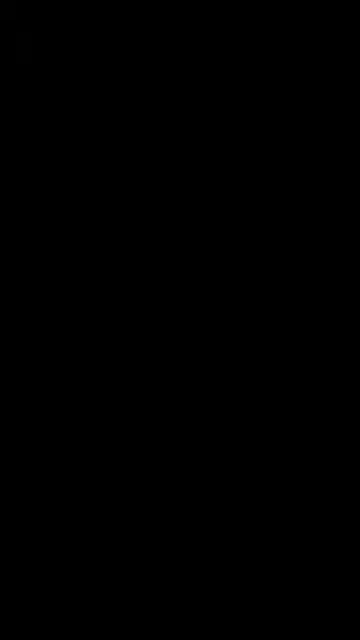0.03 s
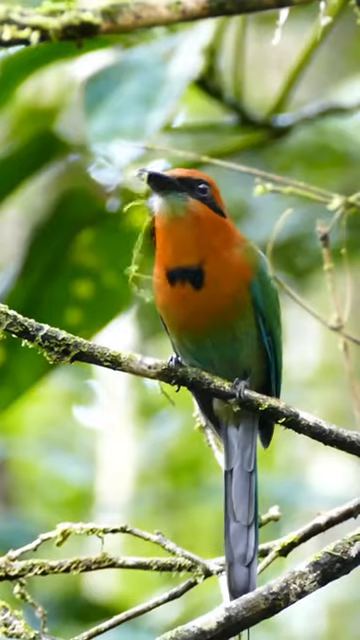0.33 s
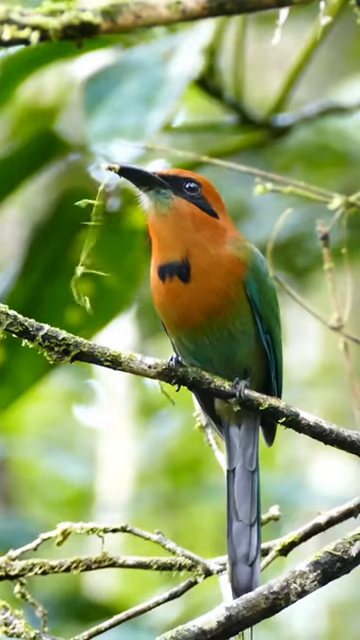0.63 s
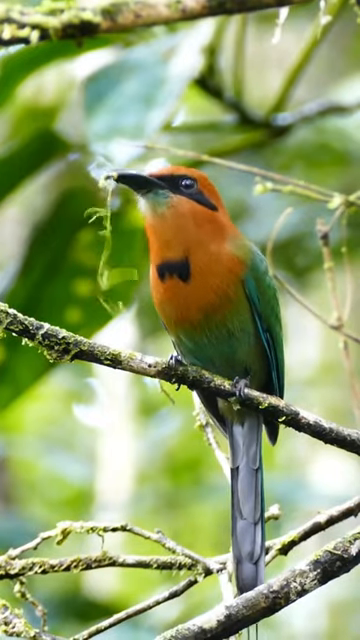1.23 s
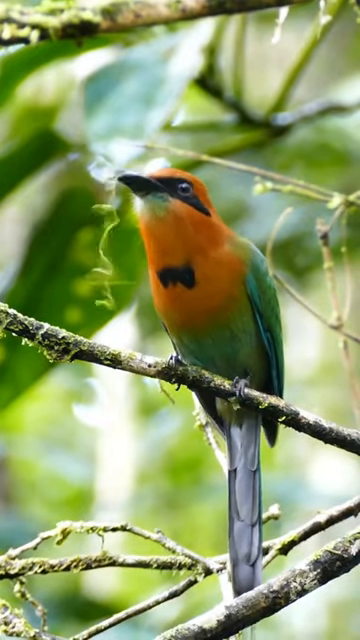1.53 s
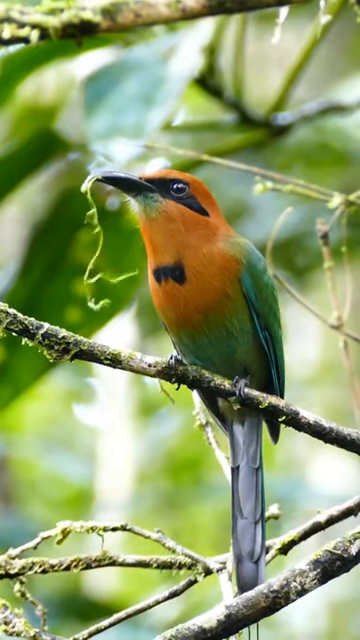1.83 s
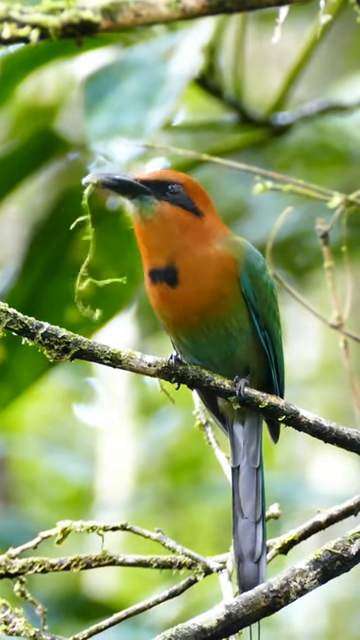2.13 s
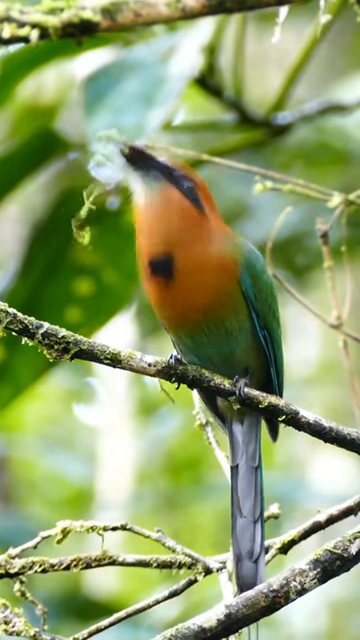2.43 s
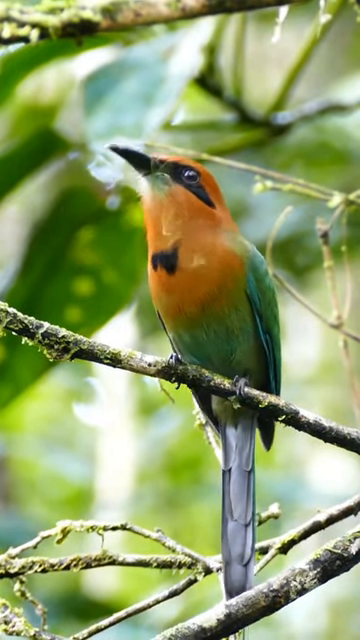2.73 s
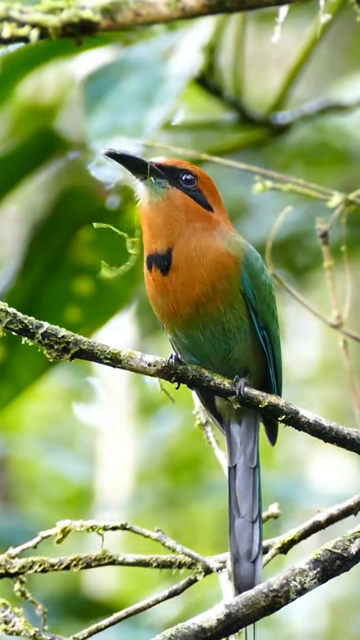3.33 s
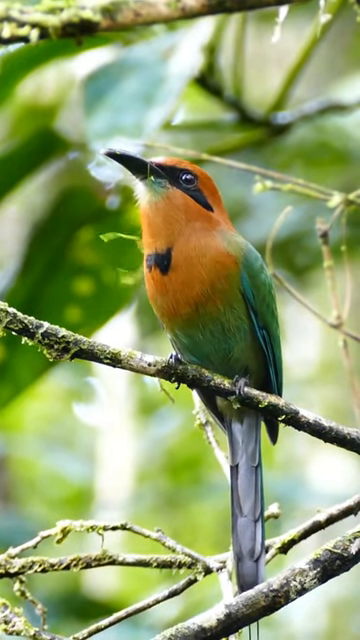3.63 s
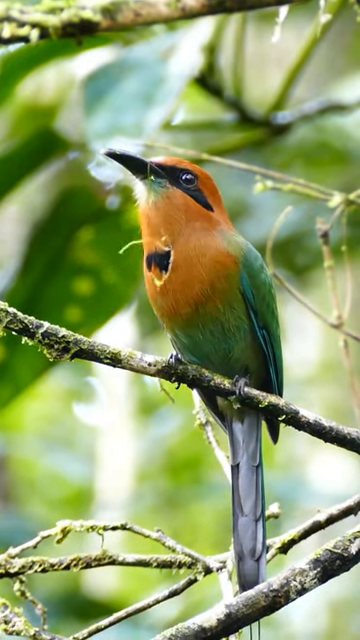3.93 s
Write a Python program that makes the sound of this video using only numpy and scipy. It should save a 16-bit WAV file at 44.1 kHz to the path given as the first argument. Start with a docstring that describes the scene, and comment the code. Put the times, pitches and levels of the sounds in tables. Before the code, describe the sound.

A constant high hiss of insects fills a forest. A few short raspy chirps come from a bird near the microphone, early and again at the end, with distant whistles, light drips on leaves and two thin high calls between.

```python
"""A rainforest. From the start, insects hiss high in the leaves over a soft, distant rush, and the
treble has a watery flicker. A small bird close by scolds with one raspy chirp, a drop taps a leaf, and
far birds begin to whistle. The near bird chirps twice more, then further drops set leaves ringing.
Past halfway another bird gives two thin high calls, while a lower one hoots far off to the right.
Three last scolding chirps close the scene."""
import sys
import numpy as np
from scipy import signal
from scipy.fft import rfft, irfft
from scipy.io import wavfile

SR = 44100
rng = np.random.default_rng(int(sys.argv[2]) if len(sys.argv) > 2 else 0)


def wav_out(sig):
    """Save sig, one row per channel (or a flat mono array), as 16-bit PCM at SR to the path in sys.argv[1]."""
    wavfile.write(sys.argv[1], SR, np.round(np.clip(np.atleast_2d(sig).T, -1, 1) * 32767).astype(np.int16))


N = 176400
T = np.arange(N) / SR
FREQS = np.maximum(np.arange(N // 2 + 1) * SR / N, 1)
FOREST_T60_S, LEAF_T60_S = 1, 0.049


# The scolding chirps. Each row: start in seconds, time of the upward flick in seconds,
# then the levels of the opening, the flick and the rasp in dB, before the throat colours them.
CHIRPS = [(0.195, 0.26, -57.5, -47.5, -80), (1.119, 1.184, -51, -43, -59),
          (1.247, 1.307, -46.5, -42.5, -54), (3.5523, 3.623, -50.5, -42.5, -58),
          (3.685, 3.7452, -45.5, -42, -51), (3.827, 3.889, -44, -42.5, -59)]

def scolding_bird():
    """Each chirp swoops down to a rasping low note, swells, then flicks cleanly up and falls away."""
    low_hz, swoop_hz, swoop_s = 2125, 6300, 0.0028
    flick_hz, flick_s, sag_hz_per_s = 3063, 0.0036, 32700
    attack_s, opening_s, swell_s, hold_s, release_s = 0.002, 0.014, 0.017, 0.0087, 0.0026
    pulses_per_s, rasp_hz, second_voice_offset_hz = 190, 158, 1320
    throat_hz, throat_width_hz, throat_db = 3650, 750, 3.5
    out = np.zeros(N)
    for start, flick_at, opening_db, flick_db, rasp_db in CHIRPS:
        t, since_flick = np.maximum(T - start, 0), T - flick_at
        hz = low_hz + swoop_hz * np.exp(-t / swoop_s)
        hz += flick_hz / (1 + (since_flick / flick_s) ** 2)
        hz -= sag_hz_per_s * np.clip(since_flick, 0, 2 * hold_s)
        opening = from_db(opening_db) * np.exp(-(t / opening_s) ** 2)
        swell = from_db(flick_db) * np.exp(np.minimum(since_flick + flick_s, 0) / swell_s)
        # The rasp lives only between the swoop and the flick.
        rasp = np.clip(t / opening_s - .5, 0, 1) * np.clip(-since_flick / (2 * flick_s) - .5, 0, 1)
        level = np.sqrt(opening ** 2 + swell ** 2 + (rasp * from_db(rasp_db)) ** 2)
        level *= np.minimum(t / attack_s, 1) * np.exp(-np.maximum(since_flick - hold_s, 0) / release_s)
        level *= from_db(-0.008 * np.clip(hz - 4300, 0, 4300))  # the highest pitches are softer
        # Each sweep snaps as it crosses the throat resonance.
        level *= from_db(throat_db * np.exp(-((hz - throat_hz) / throat_width_hz) ** 2))
        phase = phase_of(hz + rasp * rasp_hz * drift(500))
        second_phase = phase + phase_of(np.full(N, second_voice_offset_hz))
        second_voice = 0.71 * rasp * drift(400) * np.sin(second_phase)
        pulses = np.sin(phase_of(pulses_per_s * (1 + 0.3 * drift(pulses_per_s))))
        first_voice = (1 - 0.26 * rasp + 0.79 * rasp * pulses) * np.sin(phase)
        octave = from_db(-15) * np.sin(2 * phase)
        out += np.sqrt(2) * level * (first_voice + second_voice + octave)
    return out


# The thin high calls. Each row: start in seconds, length in seconds, first and last centre pitch
# in Hz, wobble depth in Hz, level in dB.
THIN_CALLS = [(2.546, 0.061, 7430, 7600, 520, -40.5), (3.044, 0.048, 6900, 7700, 1110, -46)]

def thin_calls():
    """A bird's pure high notes open with a dying wobble, settle and climb."""
    wobbles_per_call, wobble_decay_s = 2.54, 0.013
    out = np.zeros(N)
    for start, length, first_hz, last_hz, wobble_hz, db in THIN_CALLS:
        progress = np.clip((T - start) / length, 0, 1)
        climb = first_hz + (last_hz - first_hz) * progress ** 1.12
        depth = wobble_hz * np.exp(-progress * length / wobble_decay_s)
        wobble = depth * np.cos(2 * np.pi * wobbles_per_call * progress)
        envelope = np.sqrt(2 * np.abs(np.sin(np.pi * progress ** 0.87)))
        out += from_db(db) * envelope * np.sin(phase_of(climb + wobble))
    return out


# Drops landing on leaves. Each row: start in seconds, pitch in Hz, level in dB,
# seconds to ring down by 60 dB.
LEAF_TAPS = [(0.613, 3580, -41, 0.0035), (1.733, 970, -51, 0.079), (1.745, 485, -48.5, 0.078),
             (1.882, 600, -55.5, 0.11), (2.107, 424, -55.5, 0.11), (2.475, 810, -52, 0.064)]

def leaf_taps():
    """Each drop rings one damped resonance; the soft leaf takes a few cycles to answer."""
    rise_cycles = 1.5
    out = np.zeros(N)
    for start, hz, db, t60 in LEAF_TAPS:
        t = np.maximum(T - start, 0)
        rise = np.minimum(t * hz / rise_cycles, 1)
        ring = from_db(db - np.minimum(60 * t / t60, 200))
        out += rise * ring * np.sin(2 * np.pi * hz * t)
    return out


# High far whistles, and a lower call of two hoots and falling notes.
# Each row: start in seconds, length in seconds, pitch in Hz, glide in Hz, level in dB.
WHISTLES = [(.72, .16, 4480, 40, -68.5), (.8, .32, 4860, -180, -64.5), (.93, .12, 5250, -200, -63),
            (1.14, .18, 5650, -200, -59.5), (1.34, .1, 5520, 0, -53), (1.2, .45, 4590, -40, -66),
            (1.52, .13, 5900, 40, -55.5), (1.69, .1, 6020, -50, -53.5), (1.62, .42, 4750, 0, -67),
            (1.82, .13, 5950, -280, -55.5), (2.02, .14, 5800, -180, -56), (1.99, .24, 3790, 20, -63),
            (2.15, .28, 3760, -80, -66), (2.16, .2, 4620, 60, -63), (2.17, .24, 5680, -180, -58.5),
            (2.56, .05, 3740, 90, -64), (2.72, .4, 4000, 60, -69.5), (3.27, .08, 4150, 550, -66),
            (3.43, .08, 4050, 500, -70)]
HOOTS = [(2.895, 0.034, 1715, -46, -53), (3.025, 0.044, 1734, -34, -55), (2.965, 0.0576, 1147, -240, -59.5),
         (2.97, 0.062, 2120, -400, -62.5), (3.10, 0.037, 1546, -570, -62), (3.11, 0.089, 1870, -86, -65)]

def far_birds(notes, blur_hz, waver_hz):
    """Wavering glides with rounded ends, smeared by many paths through the trees."""
    steady = 0.23  # share of the power that arrives unsmeared
    waver = waver_hz * drift(19)
    smear = np.sqrt(2 * steady) + np.sqrt(1 - steady) * (drift(blur_hz) + 1j * drift(blur_hz))
    out = np.zeros(N)
    for start, length, hz, glide_hz, db in notes:
        progress = np.clip((T - start) / length, 0, 1)
        envelope = 2 * np.sqrt(progress * (1 - progress))
        phase = phase_of(hz + glide_hz * progress + waver)
        out += from_db(db) * envelope * np.real(smear * np.exp(1j * phase))
    return out


# The tone of the insect chorus. Each row: frequency in Hz, relative level in dB.
INSECT_SPECTRUM = [(4000, -30), (5000, -24), (5600, -10.5), (6100, -4.5), (6750, -2), (7800, 0.5),
                   (8500, 0.5), (9300, 4), (9900, -2), (10500, -4), (11000, -12.5), (11400, -13),
                   (12000, -43)]
# How deeply narrow bands of the treble briefly drop out, giving a watery flicker. Each row: frequency in Hz,
# depth in dB.
TREBLE_DROPOUTS = [(5500, 0.5), (6700, 4), (7500, 9), (8600, 36), (10000, 33), (11500, 37)]
# Single insects that stand out. Each row: pitch in Hz, half-width in Hz, level in dB before the swell.
SHRILL_INSECTS = [(6700, 35, -61), (8330, 120, -58), (9290, 100, -59)]
# The slow swell of the whole chorus. Each row: time in seconds, gain in dB.
INSECT_SWELL = [(0.1, 0.66), (.33, -1.9), (.45, 0.25), (.85, -0.88), (1.25, 1), (1.6, -0.13), (1.8, -0.67),
                (2.3, 0.16), (2.7, -0.46), (3.1, 0.59), (3.5, -0.081), (3.63, -1.1), (4, -1.8)]

def insects():
    """Massed wings sizzle and a few shrill voices throb, and apart from them narrow bands of the treble briefly
    drop out."""
    dropout_rate_hz, throb_hz, throb_db, sizzle_hz = 8, 8, 5.5, 48
    centres = np.linspace(5000, 12000, num=16)
    chorus = from_db(-46.5) * flickering_noise(
        INSECT_SPECTRUM, TREBLE_DROPOUTS, centres, dropout_rate_hz, shared_db=1.0, ceiling=0.2)
    for hz, half_width_hz, db in SHRILL_INSECTS:
        voice = noise_band(hz, half_width_hz)
        throb = from_db(throb_db * np.minimum(drift(throb_hz), 1))
        chorus += from_db(db) * rms_one(voice * throb)
    swell_db, sizzle_db = at_times(INSECT_SWELL), drift(sizzle_hz)
    return pan(chorus * from_db(swell_db + sizzle_db), right_db=0.3)


# The tone of the distant rush. Each row: frequency in Hz, relative level in dB.
RUSH_SPECTRUM = [(25, -42), (45, -20), (75, -16.5), (110, -19), (180, -10.5), (270, -8), (325, 3.5),
                 (390, -1.5), (440, -5.5), (630, 2), (900, -1.5), (1400, -4), (2200, -9), (3300, -13.5),
                 (4800, -16), (9000, -40)]
# How hard its bands flicker. Each row: frequency in Hz, flicker depth in dB.
RUSH_FLICKER = [(80, 2.8), (500, 3.1), (2000, 3.1), (4500, 4.2)]

def rush():
    """Distant water and foliage lay down a soft, restless bed."""
    centres = np.geomspace(60, 4500, num=16)
    bed = flickering_noise(RUSH_SPECTRUM, RUSH_FLICKER, centres, 12.2, shared_db=-0.8, ceiling=1.2)
    return pan(from_db(-58.5) * bed, right_db=-0.1)


# The rise and fall of the farthest birdsong. Each row: time in seconds, level in dB.
FAR_SONG_LEVEL = [(0, -95), (.7, -99), (1.0, -63.5), (1.9, -64), (2.3, -59.5), (2.8, -63.5), (3.4, -64),
                  (4, -65)]

def far_song():
    """Birdsong so far off that it blurs into a high wash."""
    return from_db(at_times(FAR_SONG_LEVEL)) * noise_band(5100, half_width_hz=650)


# Soft low bumps. Each row: time of the peak in seconds, half length in seconds, level in dB.
BUMPS = [(0.199, 0.036, -84), (1.677, 0.047, -70), (2.433, 0.11, -81.5)]

def bumps():
    """Brief swells of low rumble."""
    swells = sum(from_db(db) * np.exp(-((T - peak) / half) ** 2) for peak, half, db in BUMPS)
    return swells * noise_band(81, half_width_hz=20)


# The stereo width of the ambience. Each row: frequency in Hz, left-right likeness (1 is mono).
STEREO_LIKENESS = [(60, .93), (190, 0.93), (350, 0.89), (620, 0.58), (1120, 0.22), (2500, 0.57),
                   (4500, 0.27), (6200, 0.8), (6800, 0.74), (7600, 0.81), (8500, 0.28), (10000, 0.22),
                   (11500, 0.53)]

def diffuse_spectrum():
    """Spectrum of white stereo noise that arrives from all around."""
    mid, side = rfft(rng.standard_normal((2, N)))
    alike = at_hz(STEREO_LIKENESS, FREQS)
    return np.sqrt(1 + alike) * mid + np.sqrt(1 - alike) * side * np.array([[1], [-1]])


def noise_band(hz, half_width_hz):
    """Diffuse noise around one pitch."""
    return rms_one(irfft(diffuse_spectrum() / (1 + ((FREQS - hz) / half_width_hz) ** 4), N))


def flickering_noise(spectrum, flicker, centres, rate_hz, shared_db, ceiling):
    """Overlapping noise bands each flicker up to a ceiling; a low ceiling leaves only brief dips."""
    noise = diffuse_spectrum() * from_db(at_hz(spectrum, FREQS))
    together_db = shared_db * drift(rate_hz)
    out = 0
    for hz, selector in zip(centres, np.eye(len(centres))):
        band = irfft(noise * np.interp(FREQS, centres, selector), N)
        own_db = at_hz(flicker, hz) * np.minimum(drift(rate_hz), ceiling)
        out = out + band * rms_one(from_db(own_db + together_db))
    return rms_one(out)


def echoes(x, t60):
    """Dying echoes from trunks and leaves, different in each ear."""
    t, build_s = T[:SR], 0.0053
    tail = rng.standard_normal((2, SR)) * from_db(-60 * t / t60) * (1 - np.exp(-t / build_s))
    tail /= np.sqrt(np.sum(tail ** 2, axis=1, keepdims=True))
    return signal.fftconvolve(x[None], tail, axes=1)[:, :N]


def nearby(x, right_db):
    """A close sound reaches the right ear first, with quick leaf echoes and a faint forest tail."""
    left_lag_s = 0.00007
    direct = np.array([np.interp(T - left_lag_s, T, x), x])
    leaves = from_db(-7.5) * echoes(x, LEAF_T60_S)
    return pan(direct + leaves, right_db) + from_db(-16) * echoes(x, FOREST_T60_S)


def distant(x, wet, right_db):
    """Share a sound between its direct path and the forest echo."""
    return pan(np.sqrt(1 - wet ** 2) * x + wet * echoes(x, FOREST_T60_S), right_db)


def pan(x, right_db):
    """Place a sound with the right side right_db above the left."""
    return x * from_db(np.array([[-right_db], [right_db]]) / 2)


def drift(rate_hz):
    """Smooth random wander at unit power, mostly slower than rate_hz."""
    return rms_one(irfft(rfft(rng.standard_normal(N)) / (1 + (FREQS / rate_hz) ** 2), N))


def phase_of(hz):
    """Running phase of a pitch curve."""
    return 2 * np.pi * np.cumsum(hz) / SR


def at_hz(points, hz):
    """Read a table on a log-frequency axis."""
    freqs, values = np.transpose(points)
    return np.interp(np.log(hz), np.log(freqs), values)


def at_times(points):
    """Draw a table of times and values as a curve over the scene."""
    return np.interp(T, *np.transpose(points))


def from_db(db):
    """Decibels to gain."""
    return 10 ** (np.asarray(db) / 20)


def rms_one(x):
    """Scale to unit power."""
    return x / np.sqrt(np.mean(x ** 2) + 1e-20)


def scene():
    """The near bird stands clear of the insect bed; far birds carry more forest echo."""
    scolding = nearby(scolding_bird(), right_db=-1.5)
    calls = distant(thin_calls(), wet=0.26, right_db=4.5)
    drops = distant(leaf_taps(), wet=0.11, right_db=8.0)
    hoots = distant(far_birds(HOOTS, blur_hz=39.8, waver_hz=14.1), wet=0.35, right_db=16.0)
    whistles = distant(far_birds(WHISTLES, blur_hz=62, waver_hz=41.4), wet=0.6, right_db=5.5)
    ambience = far_song() + insects() + rush() + bumps()
    return scolding + calls + drops + hoots + whistles + ambience


def record(dry):
    """The sound switches on after a moment of silence, with its top end cut steeply."""
    start_s, fade_s, cutoff_hz = 0.0665, 0.001, 12200
    opened = dry * np.clip((T - start_s) / fade_s, 0, 1)
    return signal.sosfilt(signal.ellip(12, .1, 80, cutoff_hz, fs=SR, output="sos"), opened)


dry = scene()
out = record(dry)
wav_out(out)
```